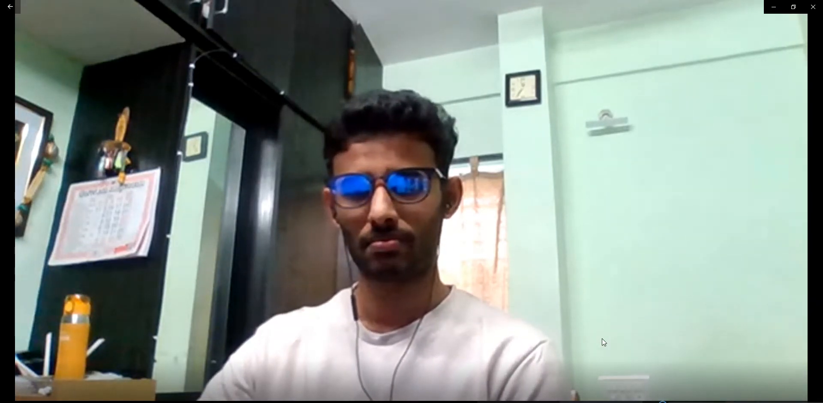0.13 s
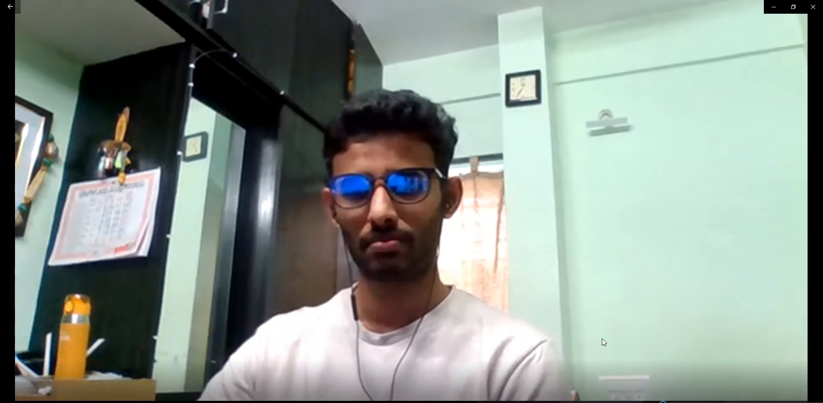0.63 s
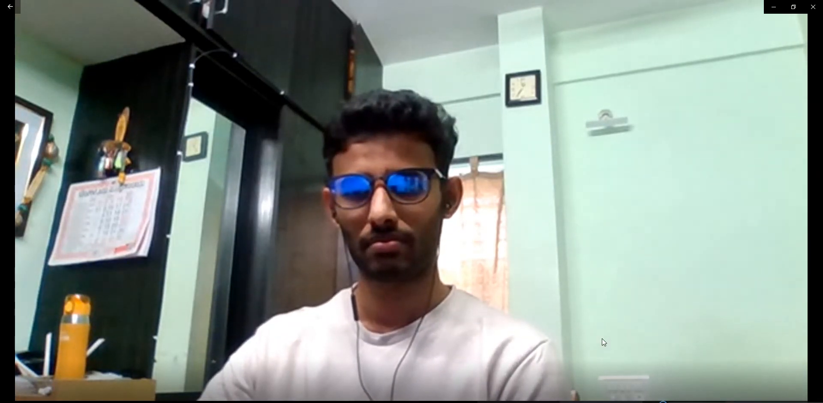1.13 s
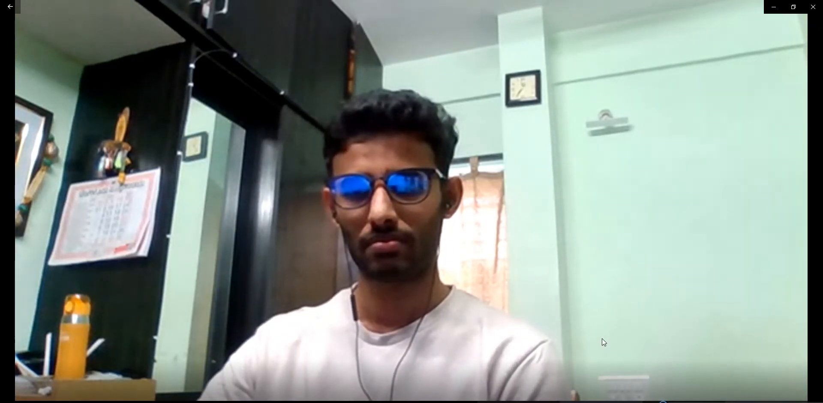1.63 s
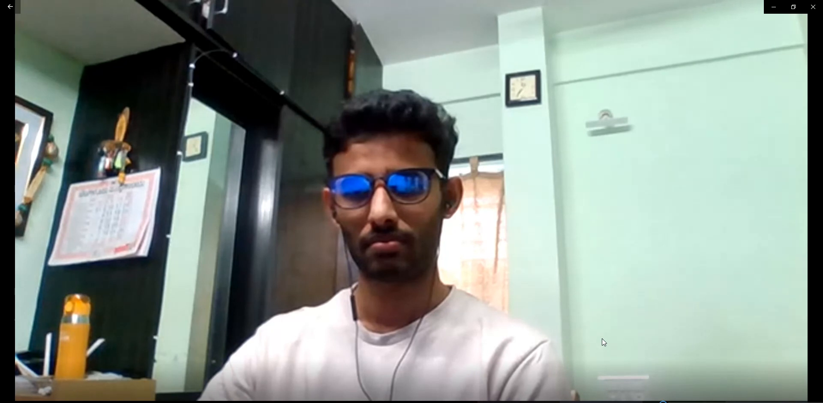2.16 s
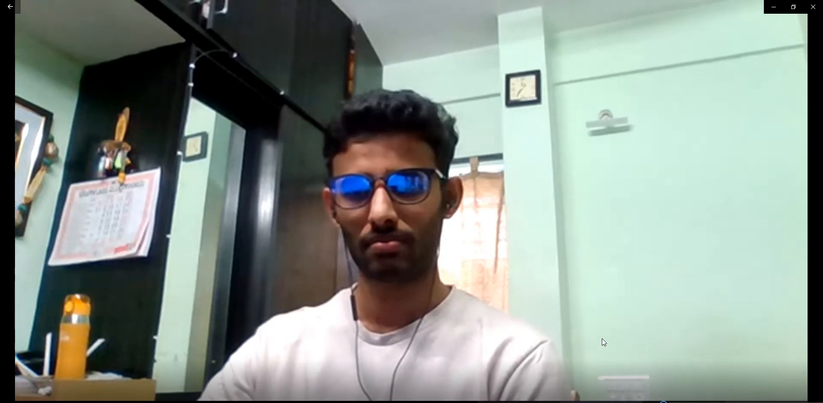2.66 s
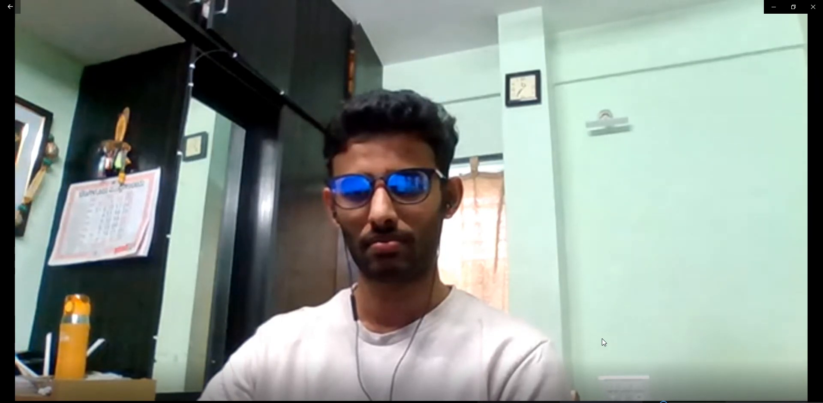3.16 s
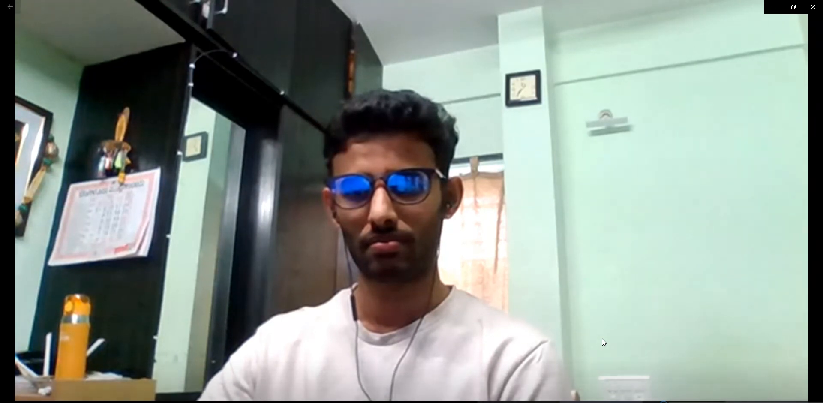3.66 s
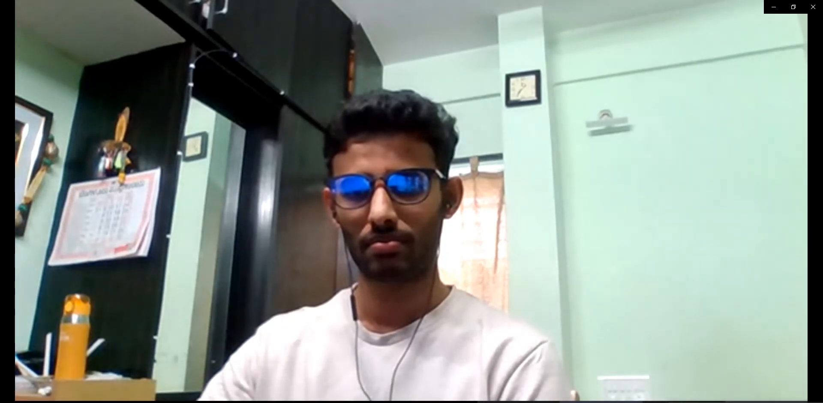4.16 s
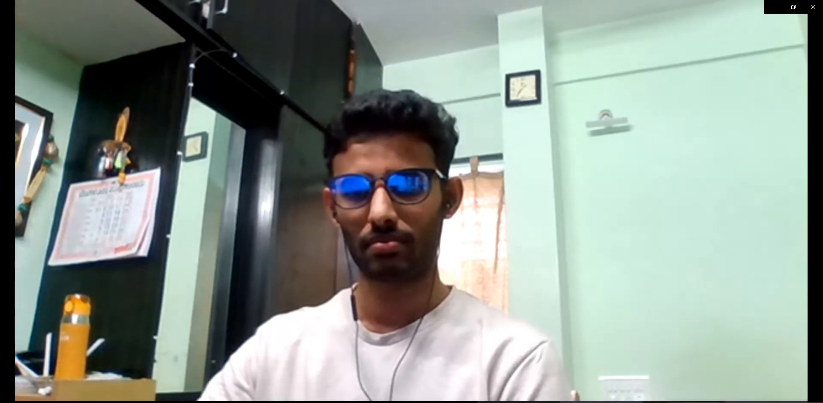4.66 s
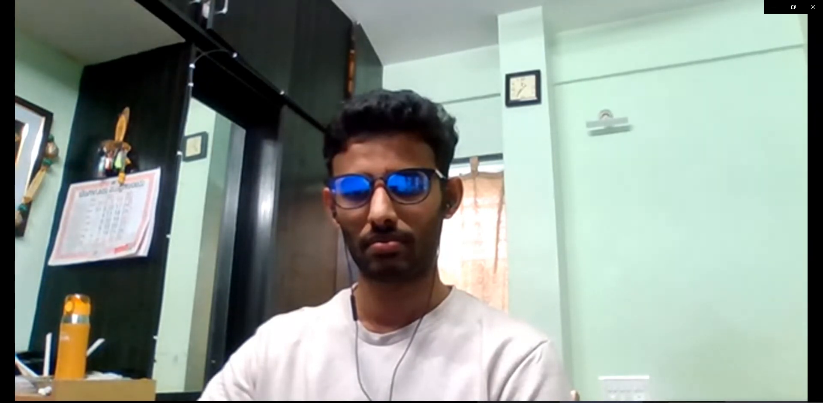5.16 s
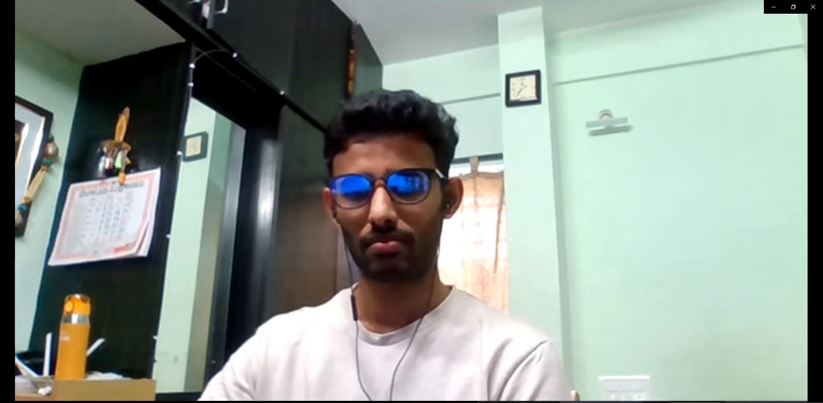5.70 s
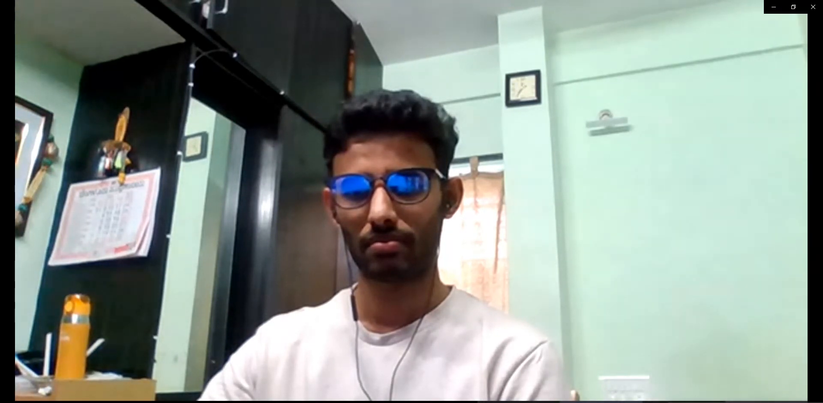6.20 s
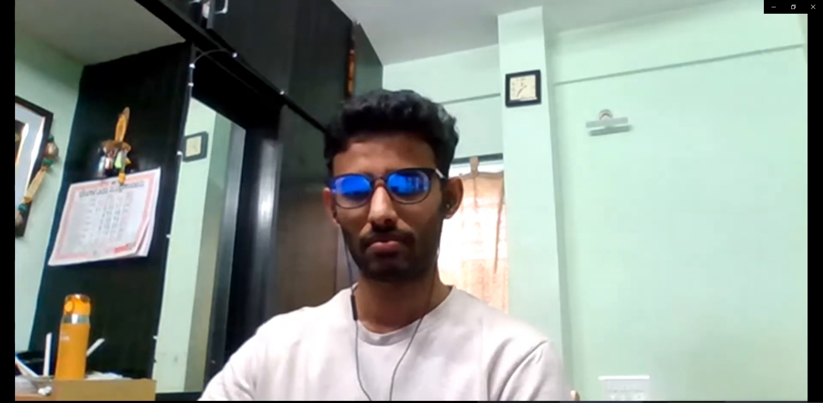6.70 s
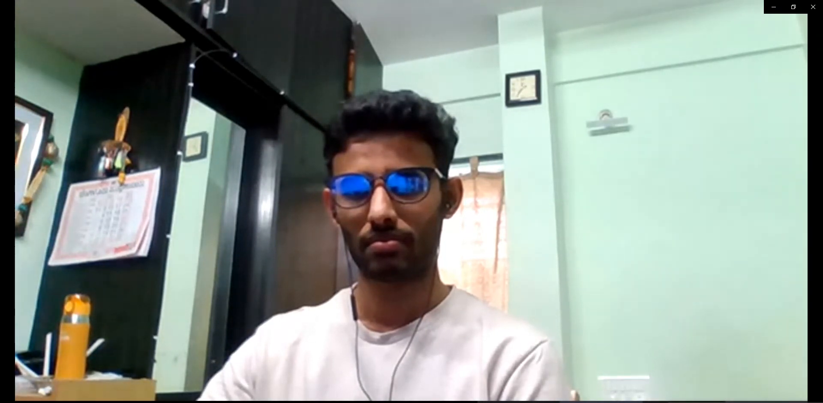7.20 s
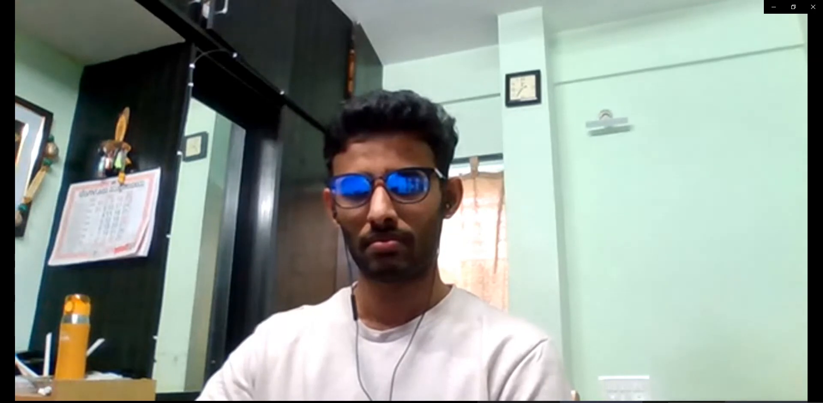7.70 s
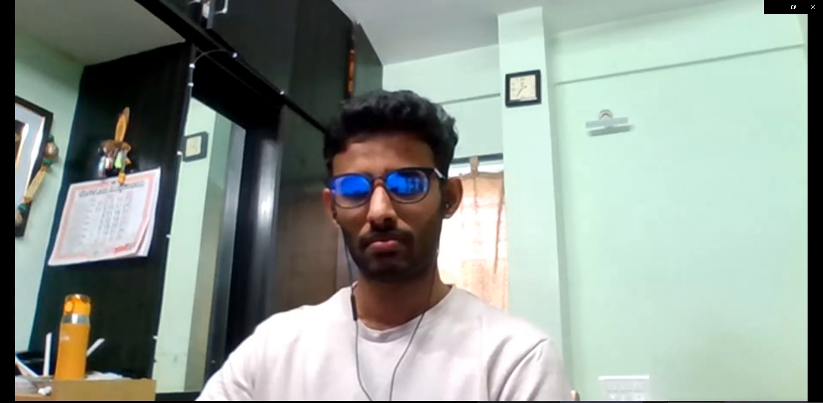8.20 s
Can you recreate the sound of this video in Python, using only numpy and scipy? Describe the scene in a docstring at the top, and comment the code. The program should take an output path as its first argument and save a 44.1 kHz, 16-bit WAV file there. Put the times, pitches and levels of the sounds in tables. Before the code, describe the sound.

In a quiet small room, a wall clock ticks once a second over steady low rumble and faint hiss. Close to the microphone, fingers tap a plastic laptop keyboard in uneven clusters, then pause. The level drops out for an instant at about five seconds; sharper key clicks return, the room noise grows, thin squeaks appear, and a low tone swells three times as typing ends.

```python
"""A wall clock ticks once a second throughout, over low rumble and faint hiss in a quiet room.
From 0.3 s fingers type on a plastic laptop keyboard close to the microphone, until 3.6 s.
At 5 s the level drops out briefly; typing resumes, the room noise is louder, faint squeaks follow.
Near 7 s a low tone swells three times; typing ends at 7.3 s. Contacts are noise bursts through
resonances with a room tail; rumble and hiss are shaped noise; the low tone is an unsteady sine."""
import sys
import numpy as np
from scipy import signal
from scipy.fft import rfft, irfft, next_fast_len
from scipy.io import wavfile
from scipy.ndimage import uniform_filter1d

SR = 44100
rng = np.random.default_rng(int(sys.argv[2]) if len(sys.argv) > 2 else 0)


def attenuation_scalar(level_db):
    """Turn a level in dB into a linear amplitude multiplier (20 dB per decade)."""
    decades = np.asarray(level_db, float) / 20
    return 10 ** decades


def store_wav(level_fs):
    """Save 16-bit WAV to argv[1]."""
    pcm = np.round(np.clip(np.atleast_2d(level_fs), -1, 1) * 32767)
    wavfile.write(sys.argv[1], SR, pcm.T.astype(np.int16))


N = 367441

# Peak levels of contacts are those of the dry sound, ahead of the microphone response.
# key contacts: t/s, click peak/dB, knock re click/dB, clack re click/dB, rattle t60/s
KEY_CONTACTS = [(0.3387, -33, -16, -0.5, .051), (0.352, -30, -6.5, 0.5, 0.021), (0.3755, -40, 2, 9, 0.013),
                (0.4287, -23.5, -25, -4, 0.036), (0.4436, -29.5, -18.5, -3, 0.0067),
                (0.6819, -44, -3, -12, 0.059), (0.7105, -42.5, -5, -4, 0.031), (0.7375, -65, 10, 10, 0.024),
                (0.7562, -60.5, 2, 0, .03), (1.0086, -56, 6.5, 0, .037), (1.0228, -56, 4, -4, 0.017),
                (1.3254, -55, 8, 1.5, 0.04), (1.3499, -44, 3.5, 7.5, 0.0058),
                (1.6051, -41.5, 6.5, 8, 0.0051), (1.63, -58, 13.5, 0, 0.01), (1.654, -53, 6, -8, 0.028),
                (1.9748, -55, -12, 7, 0.036), (1.9991, -27.5, -9.5, 0, 0.034),
                (2.0364, -22.5, -24, -4, 0.055), (2.0487, -37, -13, 3, .025), (2.288, -53, 2, 6, 0.041),
                (2.3095, -30.5, -13, -9, 0.017), (2.3284, -35.5, -6.5, 1, 0.037),
                (2.6075, -53.5, -4, 2, 0.076), (2.6266, -48, -13, -6, 0.045), (2.6552, -46.5, -3, 4, .02),
                (2.8847, -57, -9, -4, 0.033), (2.912, -54.5, -2.5, 3, 0.11), (3.2315, -58, 2, 15.5, 0.018),
                (3.2465, -32.5, -10, -3, 0.015), (3.2557, -27, -4.5, 1.5, .032),
                (3.2725, -23.5, -31.5, 0, 0.024), (3.2856, -23, -21, -7, .05),
                (3.563, -23.5, -13, -2.5, 0.016), (3.587, -24, -14.5, -2, 0.02),
                (3.596, -26.5, -21, -11.5, .02), (5.0655, -16.5, -46, -19.5, .022),
                (5.2023, -16.5, -32, -22, 0.013), (5.7457, -50, -10, 3, 0.056), (5.765, -45.5, -11, 0, 0.1),
                (6.0678, -62.5, 16.5, 7, 0.014), (6.1855, -31.5, -5.5, -2, .014),
                (6.1993, -22, -30, -4, 0.016), (6.2046, -20, -23.5, -4.5, 0.028),
                (6.2149, -25, -18, -6.5, 0.044), (6.235, -32, -10, -4, 0.018),
                (6.5101, -16.5, -9.5, 1, 0.0085), (6.5227, -24, -4, -0.5, 0.01),
                (6.6098, -39.5, -28, -7, 0.038), (6.838, -45, -5.5, -1, .036),
                (6.8615, -11.5, -10, -5, 0.013), (6.9228, -33, -5, -2, 0.036), (6.9506, -42, -9, 6, 0.017),
                (7.24, -56.5, -10, 15.5, 0.031), (7.2685, -43, -4, 1, 0.036),
                (7.301, -36, -11.5, 1.5, 0.021), (7.331, -36, 4, -4, 0.013)]
# firm strokes that push through to the desk: t/s, peak level/dB
DESK_PUSHES = [(0.353, -32), (0.432, -29.5), (0.7073, -38.5), (2.0376, -30), (2.3105, -35), (3.247, -34),
               (3.2732, -25.5), (3.564, -32), (3.599, -31), (5.0642, -34), (5.2032, -38), (5.7648, -30.5),
               (6.189, -27), (6.5075, -33.5), (6.865, -28), (6.9228, -33), (7.29, -36.5)]
# wide-key strokes that set the wire ringing: t/s, peak level/dB
WIRE_STROKES = [(0.6817, -42.5), (0.7097, -42), (2.306, -32.5), (2.3316, -47)]
# Resonances: f/Hz, width/Hz, relative level/dB
# bright snap of the cap
CLICK_MODES = [(4900, 1700, -2.5), (5760, 330, 1), (5920, 860, 2.5), (7710, 1100, -1.5)]
# cap and hinge
CLACK_MODES = [(1930, 700, -10.5), (2230, 340, -3), (3100, 460, -1.5), (3870, 220, -5)]
# case
KNOCK_MODES = [(777, 78, 0.5), (889, 127, 6.5)]
# key plate, woken mostly by hard blows
PLATE_MODES = [(1454, 130, 0)]
# desk
DESK_MODES = [(200, 24, 0.5), (269.6, 18.4, -0.5), (342, 29, -1.5)]
# steadying wire under a wide key
WIRE_MODES = [(2420, 130, 0)]
# clock's gear plate
GEAR_PLATE_MODES = [(1350, 58, -7), (3706, 130, 3.5)]
# clock housing
HOUSING_MODES = [(1450, 270, -3), (3140, 790, -2), (3740, 250, 3.5), (4530, 93, -1), (5230, 600, -1),
                 (6350, 640, 2), (7230, 1700, -17.5)]
# clock ticks: t/s, ping peak/dB, shiver peak/dB
CLOCK_TICKS = [(0.1182, -28.5, -34.5), (1.1154, -39, -37.5), (2.1175, -28.5, -33), (3.1142, -36, -38),
               (4.1148, -29, -29.5), (5.116, -35.5, -33), (6.1122, -37, -32), (7.116, -32.5, -31.5),
               (8.1148, -30.5, -26.5)]
# faint high squeaks: t/s, peak level/dB, f/Hz
SQUEAK_EVENTS = [(5.868, -47.5, 6800), (5.896, -50, 6800), (5.9534, -48, 6730), (6.44, -51, 6050),
                 (6.608, -45, 5660), (6.772, -46.5, 5670)]
# low tone that sinks and swells: t/s, f/Hz, level/dB
GROWL_PATH = [(6.8, 120.8, -65.5), (6.97, 120.1, -25.5), (7.06, 116.6, -36), (7.14, 113.8, -23.5),
              (7.2, 100.1, -40), (7.28, 94.2, -19), (7.38, 92.3, -32.5), (7.5, 92, -62)]
# spectrum of the rumble: f/Hz, relative level/dB
RUMBLE_SPECTRUM = [(15, -61.5), (30, -22), (55, -39), (68, -32.5), (78, -9.5), (100, 1.5), (125, 3.5),
                   (150, 0.5), (200, -5.5), (256, -7), (300, -14.5), (387, -23.5), (448, -37), (600, -52.5),
                   (1300, -120)]
# wavering tones in the rumble: f/Hz, half-width/Hz, rms at mean rumble level/dB
HUM_TONES = [(84, 3.5, -41.5), (173.9, 7.7, -39.5), (246.4, 7.5, -53)]
# spectrum of the hiss: f/Hz, relative level/dB
HISS_SPECTRUM = [(290, -53.5), (500, -8.5), (788, -2), (856, -3.5), (1160, -7), (1550, 0), (2050, -5),
                 (3160, -11.5), (4390, -14), (4990, -20.5), (6840, -11.5), (8150, -39), (10600, -65.5),
                 (17900, -120)]
# spectrum of the high hiss: f/Hz, relative level/dB
HIGH_HISS_SPECTRUM = [(2350, -25.5), (4000, -9), (4170, -23), (4840, 9), (5400, 4), (5890, 8.5),
                      (6420, -3.5), (6960, 8), (7110, 2), (8150, -28), (10600, -65), (17900, -120)]
# background: t/s, rumble level/dB, hiss level/dB
BACKGROUND_LEVELS = [(0, -35.5, -60), (0.2, -38.5, -66), (1.9, -37.5, -65.5), (2.2, -37, -58),
                     (2.65, -38.5, -66.5), (3.3, -35.5, -59.5), (3.8, -36, -63.5), (4.2, -36.5, -61),
                     (5.0, -36.5, -64.5), (5.05, -35.5, -59.5), (5.6, -34, -60.5), (6, -31, -56),
                     (6.9, -32.5, -56), (7.3, -29.5, -52), (7.65, -30.5, -57.5), (8.33, -34, -58)]
# high hiss: t/s, level/dB
HIGH_HISS_LEVEL = [(0, -62.5), (0.25, -74), (2.2, -78), (3.8, -70), (5.0, -74), (5.05, -60.5), (5.5, -65),
                   (6.9, -57.5), (8.33, -63)]
# room decay: f/Hz, t60/s
ROOM_DECAY = [(300, 0.31), (1500, 0.33), (4000, 0.18), (8000, 0.17)]
# microphone response: f/Hz, gain/dB
MICROPHONE_RESPONSE = [(50, -4.5), (80, 6), (400, 5), (550, -4), (750, 4.5), (7300, -2), (7900, -17.5),
                       (8400, -50), (9000, -72)]
# brief dropout in level: t/s, gain/dB
DROPOUT_GAIN = [(4.972, 0.5), (4.985, -19), (5.008, -28), (5.0595, -38), (5.0605, -16), (5.066, 0.5)]


def keys():
    """The cap slides in its hinge and lands: it rattles, knocks the case, and slowly pushes the desk."""
    track = np.zeros(N)
    for s, click_db, knock_db, clack_db, rattle_s in KEY_CONTACTS:
        # light contacts start softly
        force = burst(rise_s=0.0009 * attenuation_scalar(-0.3 * (click_db + 18.5)), t60_s=rattle_s)
        cap = ring(force, CLICK_MODES, click_db) + ring(force, CLACK_MODES, click_db + clack_db)

        case_force = burst(rise_s=0.0059, t60_s=1.4 * rattle_s)
        knock = ring(case_force, KNOCK_MODES, click_db + knock_db)
        knock += ring(force, PLATE_MODES, click_db + knock_db + 0.33 * (click_db + 19))

        slide_force = burst(rise_s=0.0012, t60_s=0.043)
        slide = ring(slide_force, CLICK_MODES + CLACK_MODES, click_db - 22.0)
        slide = slide[:SR // 30][::-1]  # swells toward the landing

        add(track, s - len(slide) / SR, slide)
        add(track, s, room(cap, wet_db=-9.0))
        add(track, s, room(knock, wet_db=-8.5))
    for s, peak_db in DESK_PUSHES:
        push = uniform_filter1d(burst(rise_s=0.0081, t60_s=0.15), size=48)  # desk feels only the slow part
        add(track, s, ring(push, DESK_MODES, peak_db))
    for s, peak_db in WIRE_STROKES:
        wire = ring(burst(rise_s=0.0011, t60_s=0.029), WIRE_MODES, peak_db)
        add(track, s, room(wire, wet_db=-9))
    return track


def clock():
    """The stepper slips, lands with a ping of the gear plate, and the housing shivers."""
    slip_lead_s, slip_re_shiver_db = 0.012, -10.5
    track = np.zeros(N)
    for s, ping_db, shiver_db in CLOCK_TICKS:
        slip = ring(burst(rise_s=0.0025, t60_s=0.055), GEAR_PLATE_MODES, 0)
        slip = ring(slip, GEAR_PLATE_MODES, shiver_db + slip_re_shiver_db)
        add(track, s - slip_lead_s, slip)

        ping = ring(burst(rise_s=0.0017, t60_s=0.038), GEAR_PLATE_MODES, ping_db)
        shiver = ring(burst(rise_s=0.0027, t60_s=0.26), HOUSING_MODES, shiver_db)
        add(track, s, room(ping + shiver, wet_db=-8.0))
    return track


def squeaks():
    """Short, thin, noisy squeaks: a burst through one resonance twice, for a narrow band."""
    track = np.zeros(N)
    for s, peak_db, hz in SQUEAK_EVENTS:
        mode = [(hz, 300, 0)]
        once = ring(burst(rise_s=0.008, t60_s=0.09), mode, 0)
        add(track, s, ring(once, mode, peak_db))
    return track


def growl():
    """A sine with slightly unsteady pitch that sinks and swells three times."""
    hz, level_db = curves(GROWL_PATH)
    flutter = unit(filtered(rng.standard_normal(N), lambda f: 1 / (1 + (f / 9) ** 4)))
    phase = 2 * np.pi * np.cumsum(hz * (1 + 0.015 * flutter)) / SR
    return attenuation_scalar(level_db) * np.sin(phase)


def background():
    """Patchy rumble with wavering narrow-band tones, under two layers of hiss."""
    rumble_db, hiss_db = curves(BACKGROUND_LEVELS)
    high_db, = curves(HIGH_HISS_LEVEL)
    tones = np.zeros(N)
    for hz, half_width_hz, level_db in HUM_TONES:
        tone = filtered(rng.standard_normal(N), lambda f: 1 / (1 + ((f - hz) / half_width_hz) ** 2))
        tones += attenuation_scalar(level_db) * unit(tone)
    tones *= attenuation_scalar(0.72 * (rumble_db - rumble_db.mean()))  # follows the rumble, less widely
    rumble = attenuation_scalar(rumble_db) * rush(RUMBLE_SPECTRUM, patchy_db=1.02)
    hiss = attenuation_scalar(hiss_db) * rush(HISS_SPECTRUM, patchy_db=0.9)
    high_hiss = attenuation_scalar(high_db) * rush(HIGH_HISS_SPECTRUM, patchy_db=2.2)
    return rumble + tones + hiss + high_hiss


def burst(rise_s, t60_s):
    """Force of a contact: a rough push that rises quickly and dies."""
    t = np.arange(6144) / SR
    envelope = (1 - np.exp(-t / abs(rise_s))) * attenuation_scalar(-60 * t / abs(t60_s))
    return envelope * rng.standard_normal(len(t))


def ring(force, resonances, peak_db):
    """Force through parallel band-pass resonances of alternating sign, scaled to a peak level."""
    f = np.fft.rfftfreq(2 * len(force), 1 / SR)
    body = 0
    for k, (hz, width_hz, level_db) in enumerate(resonances):
        gain = attenuation_scalar(level_db + 2.5 * rng.standard_normal())  # every blow wakes them a little differently
        damping = 1j * f * width_hz
        body = body + (-1) ** k * gain * damping / (hz * hz - f * f + damping)
    sound = irfft(rfft(force, 2 * len(force)) * body)[:len(force)]
    return attenuation_scalar(peak_db) * sound / np.abs(sound).max()


def room(sound, wet_db):
    """The sound plus a fresh noise tail in which each frequency dies at its own speed."""
    hz, t, z = signal.stft(rng.standard_normal(SR // 3), SR, nperseg=256)
    decay = attenuation_scalar(-60 * t / along(ROOM_DECAY, hz)[:, None])
    tail = signal.istft(z * decay, SR, nperseg=256)[1]
    tail = tail / np.linalg.norm(tail)
    out = attenuation_scalar(wet_db) * signal.fftconvolve(np.pad(sound, (200, 0)), tail)  # tail 200 samples late
    out[:len(sound)] += sound
    return out


def rush(spectrum, patchy_db):
    """Coloured noise of rms 1 whose gain varies in patches of time and frequency."""
    z = signal.stft(rng.standard_normal(N + 512), nperseg=512)[2]
    field = uniform_filter1d(rng.standard_normal(z.shape), size=5, axis=0)
    field = uniform_filter1d(field, size=12, axis=1)
    patchy = signal.istft(z * attenuation_scalar(patchy_db * unit(field)), nperseg=512)[1][:N]
    return unit(filtered(patchy, lambda hz: attenuation_scalar(along(spectrum, hz))))


def filtered(x, response):
    """x times a response of frequency."""
    m = next_fast_len(N + 8192)
    return irfft(rfft(x, m) * response(np.fft.rfftfreq(m, 1 / SR)), m)[:N]


def along(points, hz):
    """(f/Hz, value) points read on a log frequency axis."""
    f, v = np.transpose(points)
    return np.interp(np.log(hz + 1), np.log(f + 1), v)


def curves(rows):
    """One value per sample for each column after the time."""
    s, *cols = np.transpose(rows)
    return [np.interp(np.arange(N) / SR, s, c) for c in cols]


def unit(x):
    """x scaled to rms 1."""
    return x / np.sqrt(np.mean(x ** 2) + 1e-20)


def add(track, s, sound):
    """Mixes a sound into the track from second s."""
    part = track[round(s * SR):][:len(sound)]
    part += sound[:len(part)]


def scene():
    """Contacts, ticks and squeaks through the microphone response, plus background and low tone."""
    contacts = keys() + clock() + squeaks()
    picked_up = filtered(contacts, lambda hz: attenuation_scalar(along(MICROPHONE_RESPONSE, hz)))
    return (picked_up + background() + growl())[None]


def roll_off(x):
    """The treble ends steeply here."""
    return signal.sosfilt(signal.butter(12, 8300, fs=SR, output="sos"), x)


def record(dry):
    """Applies the gain curve in which the level drops out for a moment."""
    gain_db, = curves(DROPOUT_GAIN)
    return roll_off(dry * attenuation_scalar(gain_db))


dry = scene()
out = record(dry)
store_wav(out)
```